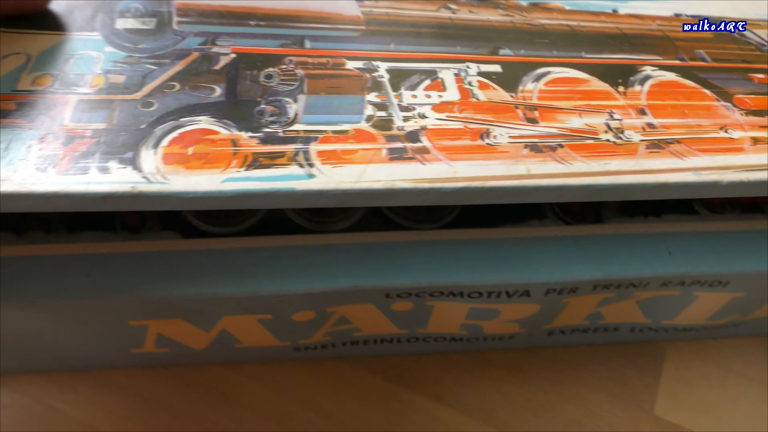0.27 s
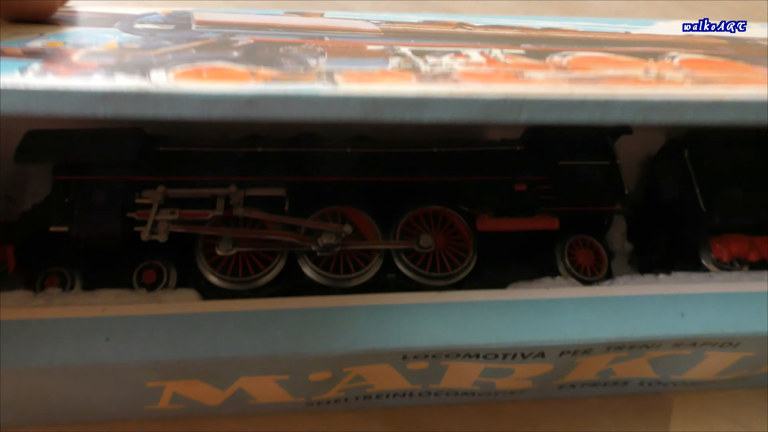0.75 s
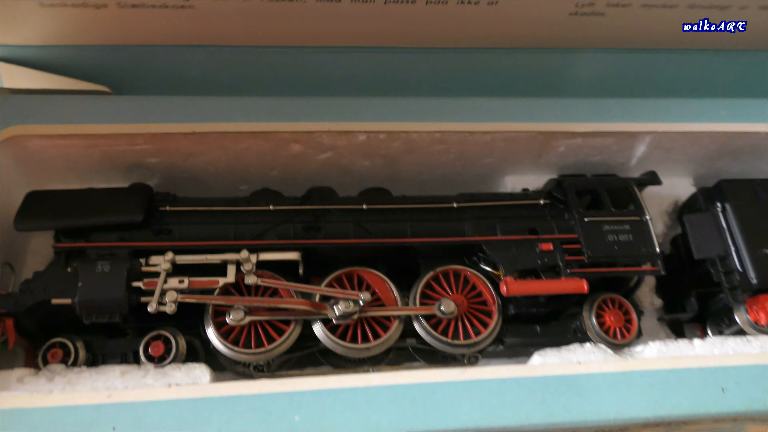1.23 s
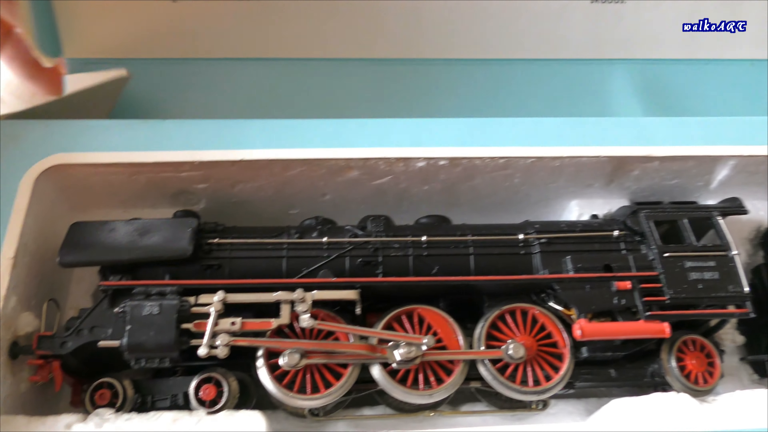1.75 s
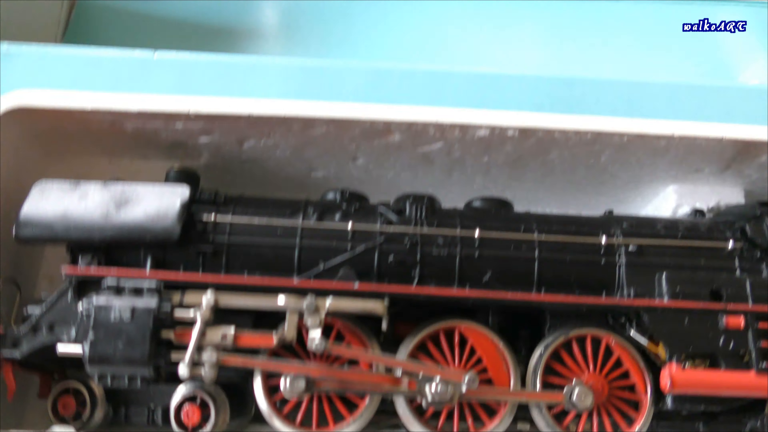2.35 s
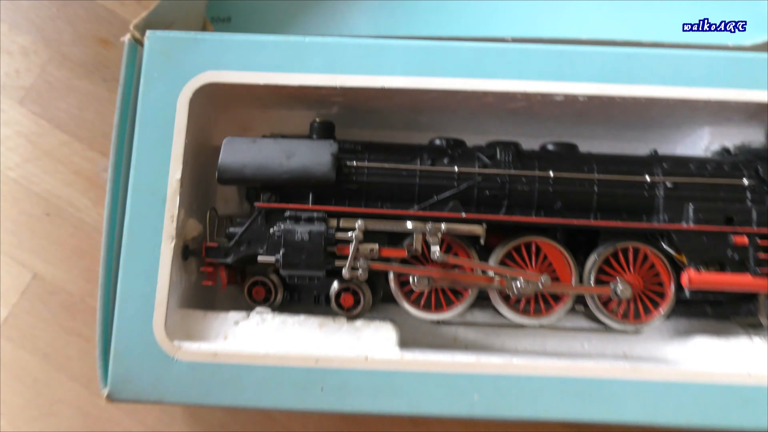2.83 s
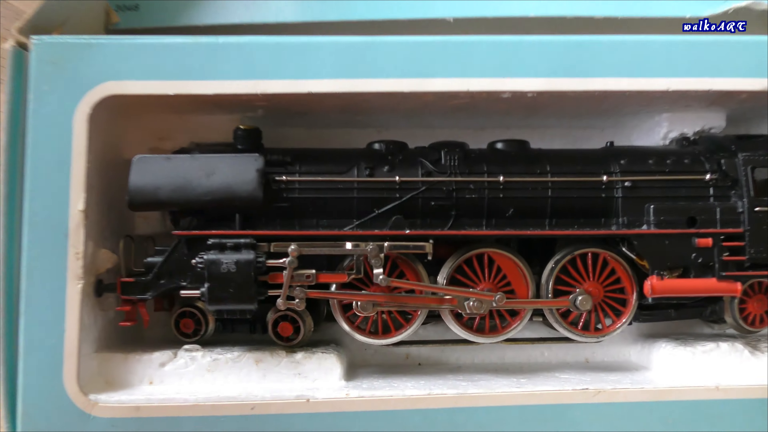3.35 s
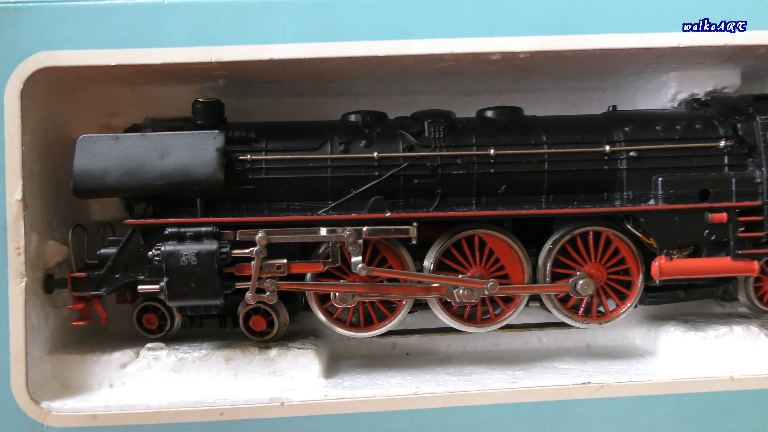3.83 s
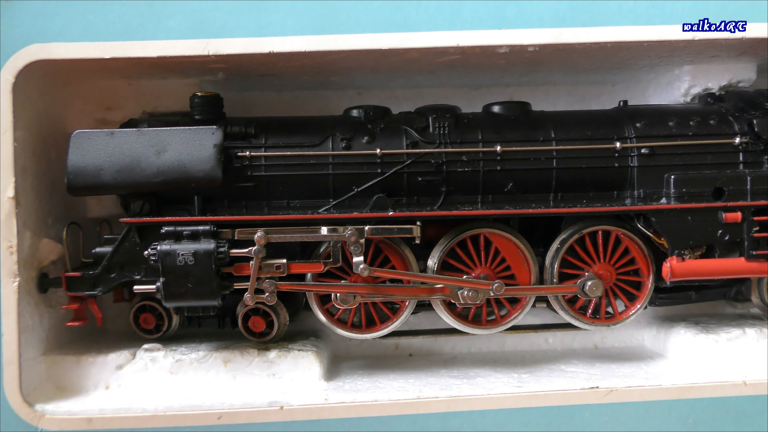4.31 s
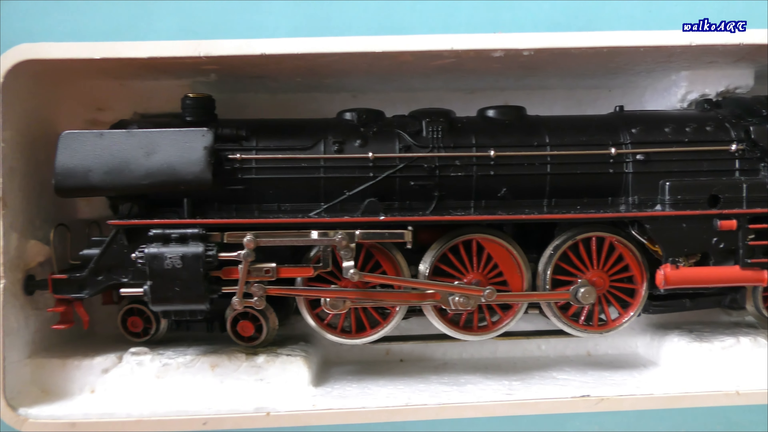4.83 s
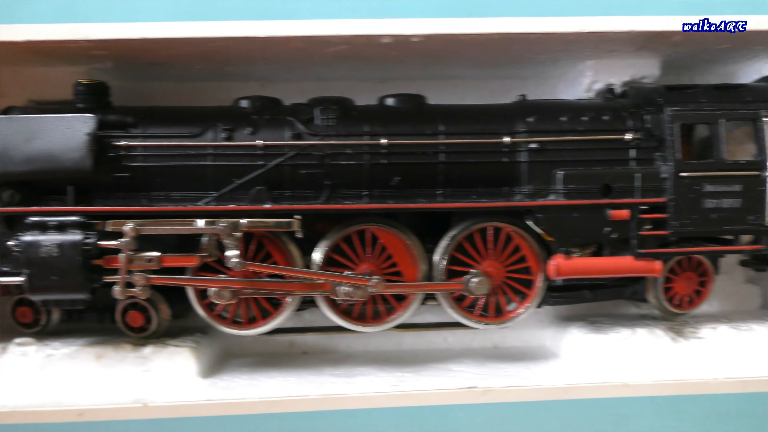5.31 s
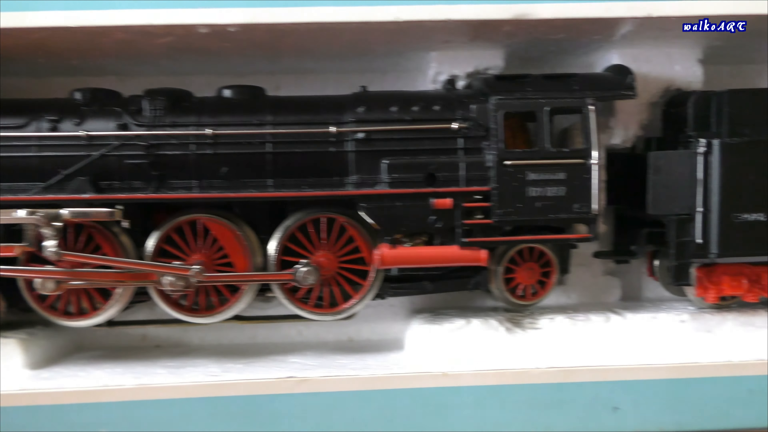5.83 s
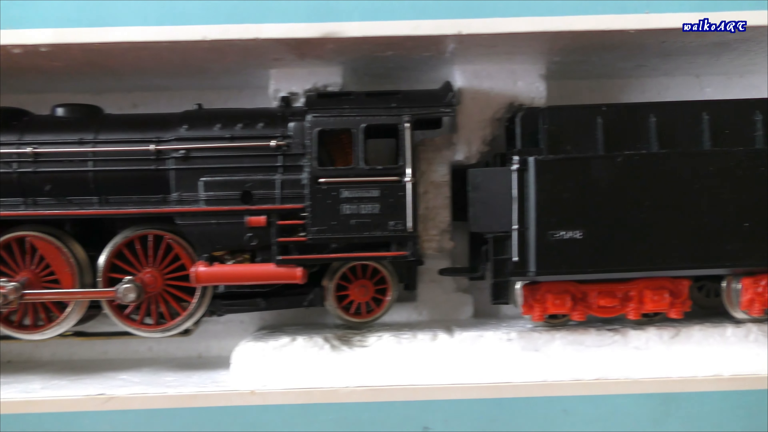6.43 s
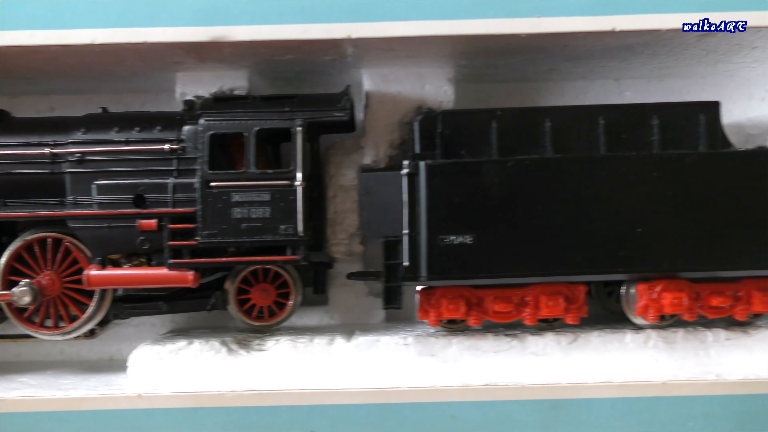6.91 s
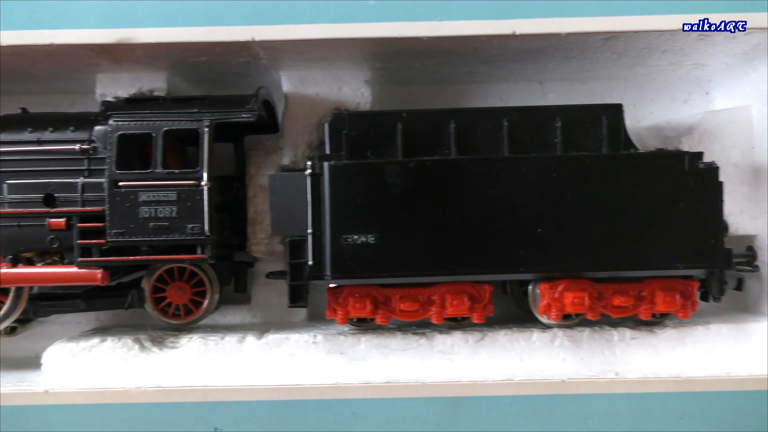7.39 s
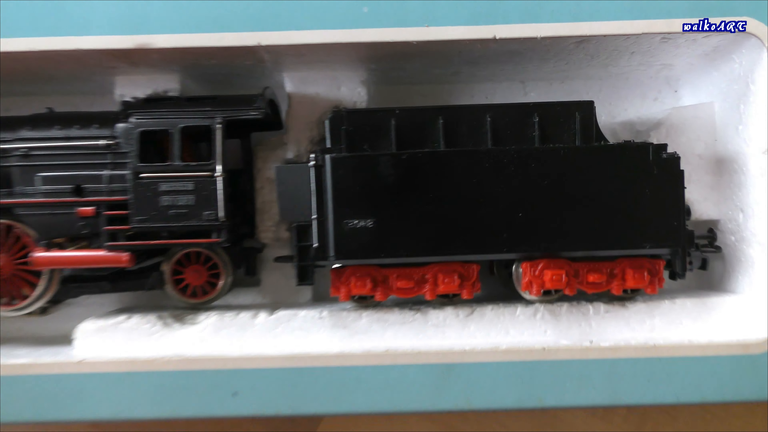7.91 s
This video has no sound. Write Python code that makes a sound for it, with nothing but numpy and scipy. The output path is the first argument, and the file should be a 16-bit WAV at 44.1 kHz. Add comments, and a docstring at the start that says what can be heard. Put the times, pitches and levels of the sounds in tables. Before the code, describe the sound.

A cardboard lid scrapes off a box and comes free with a hollow knock, followed by light creaks and ticks of handled cardboard.

```python
"""The lid of a cardboard box is drawn off close to a hand-held camera in a small room.
First it rasps along the box, stroke by stroke, as friction snaps tiny paper fibres. Its rim catches,
and at 1.4 s it comes free with a knock that rings the hollow box. Slid aside, it judders by stick and
slip as it slows. Then the board creaks and ticks under the fingers, each slip ringing its panel modes.
Soft bumps of the grip and a quiet hiss lie underneath to the end."""
import sys
import numpy as np
from scipy import signal
from scipy.fft import rfft, irfft, next_fast_len
from scipy.io import wavfile

SR = 44100
rng = np.random.default_rng(int(sys.argv[2]) if len(sys.argv) > 2 else 0)


def store_pcm(level_fs):
    """Save levels as 16-bit WAV."""
    pcm = np.round(np.clip(level_fs, -1, 1) * 32767).astype(np.int16)
    wavfile.write(sys.argv[1], SR, np.atleast_2d(pcm).T)


N = 359415
TIME = np.arange(N) / SR
FFT_SIZE = next_fast_len(N)


# strokes of the lid: t/s at full speed, rise/s per 10 dB, hold/s, fall/s per 10 dB,
# rasp level/dB, hiss level/dB, drone level/dB
STROKES = [(0.18, .14, .03, .035, -48.5, -58, -61), (1.152, .5, .18, 0.18, -47.5, -48, -50),
           (1.315, .02, 0.022, 0.01, -42, -48, -51), (1.463, .08, .1, 0.65, -56.5, -53.5, -56.5),
           (1.869, 0.2, 0.065, .15, -47, -53.5, -52), (2.093, 0.19, 0.066, 0.25, -50, -48.5, -54),
           (2.254, 0.12, 0.12, 0.07, -43.5, -63, -51.5), (2.685, 0.15, .04, 0.25, -56, -60, -57),
           (3.006, .05, 0.03, .1, -64, -60.5, -56)]
# spectra of the rasp on the box, the rasp aside, fine hiss and panel drone: f/Hz, relative level/dB
LID_RASP = [(450, -33), (620, -5.5), (780, -11), (950, -0.5), (1250, -1.5), (1600, -3.5), (2050, -1.5),
            (2600, -2), (3300, -11), (4200, -15), (6000, -33), (9000, -31)]
ASIDE_RASP = [(400, -25), (490, 7), (600, -33), (730, -6.5), (900, -0.5), (1250, 4), (1650, -1),
              (2050, -0.5), (2350, -5), (3300, -8.5), (4300, -12.5), (5600, -18), (9000, -24)]
FINE_HISS = [(1500, -7), (3500, 6), (5000, 4.5), (7000, 2), (9000, 1), (12000, 0), (16000, -7)]
PANEL_DRONE = [(40, -26), (120, -13.5), (220, -5.5), (300, 2.5), (360, -3.5), (480, -7.5), (600, -23),
               (1200, -41)]

def sliding_lid(aside_s=1.88, sticks_s=2.23, rest_s=3.25, hiss_exponent=1.85, drone_exponent=1.33):
    """Sliding friction: the rasp grows with speed, the hiss and panel drone with powers of it."""
    aside = np.clip((TIME - aside_s) / .11 + .5, 0, 1)
    sticking = np.clip((TIME - sticks_s) / .04 + .5, 0, 1)
    on_box = colour(fibres(2500, size_db=4, smooth=1, flutter_db=.85, flutter_hz=95), LID_RASP)
    pushed = colour(fibres(5000, size_db=1.5, smooth=.94, flutter_db=.55, flutter_hz=90), ASIDE_RASP)
    pushed *= 1 - sticking + sticking * chatter()
    rasp = np.sqrt(1 - aside) * on_box * pan(.8) + np.sqrt(aside) * pushed * pan(-1.2)
    hiss = colour(fibres(5000, size_db=3, smooth=1, flutter_db=1, flutter_hz=47), FINE_HISS, spread=.82)
    drone = colour(noise(), PANEL_DRONE)
    power = amp([[-64.5], [-69.5], [-63]]) ** 2  # light rub between strokes: rasp, hiss, drone
    for peak_s, rise_s, hold_s, fall_s, *levels_db in STROKES:
        before = np.maximum(peak_s - TIME, 0) / rise_s
        after = np.maximum(TIME - peak_s - hold_s, 0) / fall_s
        speed = np.maximum(amp(-10 * (before + after)), 1e-6)
        gains = amp(levels_db)[:, None] * [speed, speed ** hiss_exponent, speed ** drone_exponent]
        power = power + gains ** 2
    pressure = amp(wander(hz=14)) * np.clip((rest_s - TIME) / .12, 0, 1)
    return pressure * sum(gain * layer for gain, layer in zip(np.sqrt(power), (rasp, hiss, drone)))


def fibres(per_s, size_db, smooth, flutter_db, flutter_hz):
    """Shot noise: paper fibres snap at random over a smooth rub, both swelling with the uneven stroke."""
    snapping = rng.random(N) < per_s / SR
    snaps = snapping * amp(size_db * np.minimum(rng.exponential(1, N), 4))
    return (unit(snaps * noise()) + smooth * noise()) * amp(flutter_db * wander(flutter_hz))


def chatter(per_s=120, unevenness=.45, depth_db=12):
    """Relaxation oscillation: the level surges at each uneven slip and fades until the next."""
    slips = np.cumsum(per_s * np.exp(unevenness * wander(hz=150))) / SR
    return unit(amp(-depth_db * (slips % 1)))


# rubs of a tight edge: t/s at the peak, half length/s, level/dB, f/Hz, relative half bandwidth
SWISHES = [(0.177, 0.054, -63.5, 6840, 0.079), (0.15, 0.105, -55.5, 720, 0.81),
           (0.207, 0.035, -60.5, 4300, .25), (0.96, .12, -53.5, 2130, .2), (1.269, 0.037, -43, 4180, 0.15),
           (1.276, 0.054, -42.5, 2520, 0.079), (1.3995, .002, -23.5, 2830, 0.1),
           (1.62, .1, -54.5, 2430, 0.13), (1.918, 0.11, -52, 4420, 0.17), (2.145, 0.099, -52, 3760, 0.24),
           (3.86, .0015, -42, 5000, .16), (5.2618, .0015, -37.5, 4700, .1)]

def swishes(apart=.28):
    """Resonance: a tight edge filters the noise of a rub or flick into one band."""
    out = np.zeros((2, N))
    for s, half, db, hz, width in SWISHES:
        t = np.arange(max(-2.5 * half, -s), 2.5 * half, 1 / SR)
        rub = rng.standard_normal(len(t)) + apart * rng.standard_normal((2, len(t)))
        band = filtered(rub, [hz / (1 + width), hz * (1 + width)], "band")
        add(out, s + t[0], amp(db) * unit(band) * np.exp(-(t / half) ** 2))
    return out


# snags of the rim: t/s, level/dB, upper over lower modes/dB, snap/dB and edge/dB re level, skid/s
CATCHES = [(0.267, -43.5, 3, -10, -14.5, 0.0012), (0.599, -62, -2, 2, -5, .001),
           (0.646, -62, 0, 2, -3, .0011), (0.697, -65, 5, 8, 6, 0.0013), (0.867, -51.5, 8, -3, -8, 0.006),
           (1.13, -47, 17, 4.5, 3, .0005), (1.1423, -36.5, 26, -3, -3.5, 0.0011),
           (1.196, -44, 14, -3, -5, 0.0012), (1.2112, -45, 19, -4, -11, .0014),
           (1.2811, -36, 3, -3, -5, 0.0053), (1.2929, -26.5, 0, -9, -13, 0.0018),
           (1.304, -32.5, -3, -7, -6.5, .0012), (1.347, -41, 17, 0, -5, 0.0025),
           (1.3874, -39.5, 13, -4, -4, .0018), (1.393, -36.5, -1, -5, -4, 0.0024),
           (1.3971, -24, -7, -5, -12, .0016)]

def catches():
    """Elastic release: the paper rim snags and snaps free, and the grip damps the ringing."""
    out = np.zeros((2, N))
    for s, level_db, upper_db, snap_db, edge_db, skid_s in CATCHES:
        add(out, s, slip(level_db, upper_db, snap_db, edge_db, pan_db=0, skid_s=skid_s, ring=.75))
    return out


# blows of lid or hand on the box: t/s, peak level/dB, pitch factor, low-pass f/Hz
KNOCKS = [(0.266, -32, 1.25, 2200), (1.2939, -24.5, 1.25, 1800), (1.3039, -37, 1.07, 1200),
          (1.3971, -17.5, 0.98, 1500), (1.876, -37, 1.1, 900), (5.712, -42.5, .9, 130),
          (6.205, -44, 1.1, 200), (7.196, -44, 0.948, 180), (7.309, -47, .85, 180)]
# modes of the hollow box at pitch factor 1: f/Hz, relative level/dB, T60/s
CAVITY_MODES = [(114, -1.5, 0.042), (192, 4, 0.064), (240, -1.5, 0.034), (320, 0, 0.083),
                (402, -4.5, 0.072), (496, -1, 0.033), (607, -11, 0.025), (684, -6, 0.023)]

def knocks(rise_s=.00094, leak_hz=120):
    """Cavity resonance: blows ring the open box, which leaks deep bass; soft ones wake only low modes."""
    out, t = np.zeros((2, N)), np.arange(SR // 4) / SR
    for s, peak_db, pitch, soft_hz in KNOCKS:
        ring = sum((-1) ** k * amp(db - 60 * t / t60) * np.sin(2 * np.pi * hz * pitch * t)
                   for k, (hz, db, t60) in enumerate(CAVITY_MODES))
        ring = filtered(ring * (1 - np.exp(-t / rise_s)), leak_hz, "high", order=3)
        ring = filtered(ring, soft_hz, "low")
        add(out, s, amp(peak_db) * ring / abs(ring).max() * pan(1.2))
    return out


def judder(start_s=2.21, end_s=2.46, per_s=34):
    """Stick-slip motion: the slowing lid moves in uneven jerks, each of its own strength and colour."""
    out = np.zeros((2, N))
    for s in np.arange(start_s, end_s, 1 / per_s):
        size, place, late = rng.uniform(-1, 1, 3)
        jerk = slip(level_db=-45 + 2 * size, upper_db=2 + 4 * place, snap_db=-14, edge_db=-20)
        add(out, s + .5 * late / per_s, jerk)
    return out


# creaks of the board: t/s, level/dB, upper over lower modes/dB, snap/dB and edge/dB re level,
# boost of the lowest mode/dB, delay of a second slip/s (0 for none)
CREAKS = [(1.8755, -43.5, -4, -13, -20, 1, 0.001), (2.2523, -39, 8, -13, -24, 0, 0.011),
          (2.352, -40, 17, -12, -19, 0, 0.02), (2.386, -40, -5, -17, -22, 0, 0.0015),
          (2.4, -36.5, 5, -6.5, -23, 4, 0.0078), (2.4702, -45, 9, -13, -14, 0, 0),
          (2.6609, -40, 7, -21, -21, 2, 0.00065), (2.6729, -36.3, 3, -10.5, -21, 0, .011),
          (2.698, -43, -8, -15, -22, 0, 0.0013), (2.729, -37.5, 2.5, -21, -17, 0, 0.001),
          (2.7586, -40.5, 4, -18, -19, 0, 0), (3.1313, -44.5, 1, -13.5, -23, 0, 0.024),
          (3.2044, -38, 2.5, -8.5, -20, 1, 0.0083), (3.3558, -39, 7, -10, -21, -1, 0.00026),
          (3.3823, -36.3, 4, -12.5, -27, -3, .0095), (3.4449, -36.5, -0.5, -11, -22, -3, 0.012),
          (3.5, -37, 2, -5, -29, -1, .0124), (3.523, -41, 0, -8, -17, -1, 0.001),
          (3.5886, -37, 3, -10.5, -26, 4, 0), (3.7367, -35, 7.5, -11, -21, 6, 0),
          (3.8032, -39, 6, -12.5, -22, 0, 0.00039), (3.858, -39.5, -3, -6, -16, 1, 0),
          (4.467, -47.5, -23, -16, -29, -6, 0), (5.2597, -37.5, -3, -8, -29, -5, 0.0014),
          (6.1568, -44, 10, -6, -19, 0, 0), (6.1605, -42.5, -1.5, -10, -25, 9, 0.00044),
          (6.3888, -38.5, 1.5, -6.5, -18, 9.5, 0.01), (6.4538, -43.5, 2, -11, -24, 7, 0),
          (6.897, -55.5, -3, -19, -24, -2, 0), (7.0606, -36, 8, -11.5, -16, 2, 0),
          (7.242, -33.5, 12, -10, -17, 0, 0), (7.244, -36, 4, -8.5, -18, 3, 0.0055),
          (7.653, -46.5, -9, -17, -30, -4, 0)]

def creaks(second_slip_db=-4.5):
    """Static friction gives way: the board slips under the fingers, often again and more weakly."""
    out = np.zeros((2, N))
    for s, level_db, *touch, again_s in CREAKS:
        add(out, s, slip(level_db, *touch))
        if again_s:
            add(out, s + again_s, slip(level_db + second_slip_db, *touch))
    return out


# bending modes of the board: f/Hz, relative level/dB, T60/s
PANEL_MODES = [(492, -11, 0.067), (907, -7, 0.024), (1061, -2.5, 0.035), (1237, -4, 0.034),
               (1398, -4, 0.03), (1840, 2.5, 0.023), (1970, 1, 0.025), (2079, 7.5, 0.024),
               (2444, -1, 0.025), (2567, -4, 0.029), (3204, -2.5, 0.012), (3860, -2, 0.0073),
               (4370, -4.5, 0.0095), (4560, -5.5, 0.0088), (5230, -12.5, 0.0044), (5710, -18.5, 0.014),
               (7200, -26, 0.0075)]

def slip(level_db, upper_db, snap_db, edge_db, body_db=0, pan_db=-1.8, skid_s=.00125, ring=1):
    """Modal superposition: a short gritty skid rings the panel modes, weighted by where it lands."""
    t = np.arange(4096) / SR
    hz, db, t60 = np.transpose(PANEL_MODES)[:, :, None]
    lower, high = hz < 1550, hz > 3000
    size, detune, phase = rng.standard_normal((3, len(PANEL_MODES), 1))
    # each mode feels the skid at its own point of the panel
    age = t[:1024] / skid_s
    force = .62 * rng.standard_normal((len(PANEL_MODES), len(age)))
    force *= np.exp(-age) * (1 - np.exp(-4 * age))
    force[:, 0] = 1
    hardness_db = .94 * (snap_db + 17.5) * np.log2(hz / 4000)  # a harder snap reaches higher modes
    db = db + .9 * size + high * hardness_db
    db[0] += body_db  # a push near the middle bends the panel as a whole
    stereo_turns = np.array([-.039, .039])[:, None, None] * phase
    turns = hz * (1 + .028 * detune) * t + stereo_turns
    free = amp(db - 60 * t / (ring * t60)) * np.sin(2 * np.pi * turns)
    driven = signal.fftconvolve(free, force[None], axes=2)[:, :, :len(t)]
    driven *= np.linalg.norm(free, axis=2, keepdims=True) / np.linalg.norm(driven, axis=2, keepdims=True)
    bands = [radiate((driven * band).sum(1)) for band in (lower, ~lower & ~high, high)]
    # parting fibres give a crisp edge, partly different at each microphone
    fade = np.exp(-t / (1.5 * skid_s)) * (1 - np.exp(-5 * t / skid_s))
    crack = rng.standard_normal(len(t)) + .53 * rng.standard_normal((2, len(t)))
    edge = filtered(crack * fade, [10000, 15500], "band")
    share = 1 / np.hypot(1, amp(upper_db))
    gains = [share * amp(-.2), share * amp(upper_db), amp(snap_db), amp(edge_db)]
    sound = sum(gain * unit(part) for gain, part in zip(gains, bands + [edge]))
    sound *= np.sqrt(.007 * SR / len(t))  # level counts the energy as if spread over 7 ms
    return sound * amp(level_db) * pan(pan_db)


def radiate(x, bass_hz=330, gap_hz=665):
    """Radiation from a small panel: bass is weak, and the first two modes cancel between their peaks."""
    x = filtered(x, bass_hz, "high")
    gap = x - signal.lfilter(*signal.iirnotch(gap_hz, Q=1.4, fs=SR), x)
    return x - .73 * gap


# shifts of the grip: t/s at the middle, half length/s, bump level/dB, sway level/dB
GRIP_SHIFTS = [(0.242, .07, -64, -58.5), (0.55, .06, -59.5, -80), (0.694, .03, -55, -76),
               (0.91, 0.035, -57, -82), (1.43, 0.057, -51, -65), (2.06, 0.11, -54, -80),
               (2.36, 0.13, -49.5, -57.5), (2.68, 0.23, -58.5, -79), (3.038, 0.051, -52, -77),
               (3.163, 0.046, -55, -72), (4.81, 0.046, -78, -61), (5.25, 0.076, -62.5, -58.5),
               (5.725, 0.078, -56, -74), (6.22, .085, -50.5, -63), (6.524, 0.081, -55, -66),
               (6.716, 0.14, -61, -65), (7.213, .03, -49, -58), (7.32, .09, -54, -57),
               (7.665, 0.049, -60, -75), (7.83, .04, -63, -61), (7.91, 0.074, -55.5, -74)]
# spectra of a soft bump and of the camera's sway: f/Hz, relative level/dB
BUMP = [(30, -39), (70, -17), (110, -1), (190, 2.5), (260, -4), (350, -12), (500, -18.5), (1000, -51)]
SWAY = [(12, -10), (28, -2), (50, -4), (80, -21), (200, -36), (600, -72)]

def handling(tremble_bump_db=-66, tremble_sway_db=-79.5, lumpy_db=2):
    """Structure-borne sound: a trembling hand bumps and sways the camera, more as the grip shifts."""
    bump_power, sway_power = amp(tremble_bump_db) ** 2, amp(tremble_sway_db) ** 2
    for s, half, bump_db, sway_db in GRIP_SHIFTS:
        swell = np.exp(-np.minimum(abs(TIME - s) / half, 10) ** 2)
        bump_power += (amp(bump_db) * swell) ** 2
        sway_power += (amp(sway_db) * swell) ** 2
    bumps = colour(noise() * amp(lumpy_db * wander(hz=18)), BUMP)
    return bumps * np.sqrt(bump_power) + colour(noise(), SWAY) * np.sqrt(sway_power)


# brushes of a finger: t/s, length/s, level/dB
BRUSHES = [(4.108, 0.076, -61), (5.114, 0.064, -59), (6.117, 0.087, -55), (7.122, 0.064, -56)]

def brushes():
    """Light friction: a finger draws brief swells of rasp from the board."""
    swells = sum(amp(db) * np.sin(np.pi * np.clip((TIME - s) / length, 0, 1))
                 for s, length, db in BRUSHES)
    return swells * colour(noise(), ASIDE_RASP)


def room(x, crossfade_s=1.9, count=3):
    """Small-room reverberation: echo tails crossfade slowly, so each click has an unpitched decay."""
    shares = [np.cos(np.pi * (TIME / crossfade_s + k / count)) * np.sqrt(2 / count)
              for k in range(count)]
    return sum(signal.oaconvolve(x * share, reflections(), axes=1)[:, :N] for share in shares)


# reverberation time of the room: f/Hz, T60/s
ROOM_DECAY = [(100, 0.17), (400, 0.23), (1000, 0.39), (2200, 0.45), (5000, 0.4), (12000, 0.66)]

def reflections(gap_s=.005, early_db=5, early_s=.022, shared=.88, per_s=3000):
    """Absorption: dense echoes, strongest from the near floor and box, die at each band's own rate."""
    age = np.arange(SR // 3) / SR
    taps = rng.standard_normal((3, len(age))) * (rng.random((3, len(age))) < per_s / SR)
    taps = taps[:2] + shared * taps[2]
    taps *= (age > gap_s) * amp(early_db * np.exp(-age / early_s))
    hz, t, bands = signal.stft(taps, SR, nperseg=256)
    dull_db = -6 * np.clip(np.log2((hz[:, None] + 1) / 2700), 0, 2)
    decay_db = -60 * t / read(ROOM_DECAY, hz)[:, None]
    tail = signal.istft(bands * amp(dull_db + decay_db), SR, nperseg=256)[1]
    return tail / np.linalg.norm(tail[0])


# spectra of the room air and the microphone hiss: f/Hz, relative level/dB
ROOM_AIR = [(15, -25), (30, -9.5), (60, -16.5), (100, -3.5), (160, -8.5), (250, -12), (340, -9.5),
            (450, -16.5), (590, -29), (700, -16.5), (790, -30), (960, -13.5), (1400, -17), (2050, -16),
            (2600, -44), (4000, -67)]
MIC_HISS = [(1800, -25), (2350, 0.5), (2600, 0.5), (2790, 9.5), (2950, -2), (3200, -2.5), (3800, -10),
            (5200, -15), (6500, -20), (8000, -17), (10000, -13), (13000, -10.5), (16000, -14.5)]

def background(air_db=-61.5, hiss_db=-63.5):
    """Stationary noise: still room air and microphone hiss with a narrow peak near 2.8 kHz."""
    air = amp(air_db) * colour(noise(), ROOM_AIR, spread=2.25)
    hiss = amp(hiss_db) * colour(noise(), MIC_HISS, spread=1.57)
    return (air + hiss) * pan(1.2)


# likeness of left and right: f/Hz, correlation at spread 1
CORRELATION = [(30, 0.94), (150, 0.84), (500, 0.9), (2000, 0.82), (6000, 0.68), (14000, 0.74)]

def colour(drive, spectrum, spread=.76):
    """Partial coherence: two unrelated drives take one spectrum and blend as middle and side."""
    hz = np.fft.rfftfreq(FFT_SIZE, 1 / SR)
    mid, side = rfft(drive, FFT_SIZE) * amp(read(spectrum, hz))
    same = np.clip(read(CORRELATION, hz), 0, 1)
    side *= spread * np.sqrt((1 - same) / (1 + same))
    return unit(irfft([mid + side, mid - side], FFT_SIZE)[:, :N])


def wander(hz):
    """Random fluctuation of unit rms, band-limited to about hz."""
    f = np.fft.rfftfreq(FFT_SIZE, 1 / SR)
    lowpass = np.exp(-np.minimum(f / hz, 10) ** 2)
    return unit(irfft(rfft(rng.standard_normal(FFT_SIZE)) * lowpass, FFT_SIZE)[:N])


def noise():
    """Two uncorrelated white noises."""
    return rng.standard_normal((2, N))


def filtered(x, hz, kind, order=2):
    """Maximally flat filter."""
    return signal.lfilter(*signal.butter(order, hz, kind, fs=SR), x)


def amp(db):
    """Decibels to amplitude ratio."""
    return 10 ** (np.asarray(db) / 20)


def pan(db):
    """Level difference, left over right."""
    return amp([[db / 2], [-db / 2]])


def unit(x):
    """Normalisation to unit rms."""
    return x / np.sqrt(np.mean(x ** 2) + 1e-20)


def read(points, hz):
    """Interpolation on a log-frequency axis."""
    f, value = np.transpose(points)
    return np.interp(np.log(hz + 1), np.log(f + 1), value)


def add(mix, s, sound):
    """Superposition of a stereo sound at time s."""
    part = mix[:, max(round(s * SR), 0):][:, :sound.shape[1]]
    part += sound[:, :part.shape[1]]


def scene():
    """Direct and reverberant fields: the box and its echo add to the handling noise and background."""
    around = handling() + brushes() + background()
    box = amp(-.5) * sliding_lid() + swishes() + knocks()
    box += amp(.5) * catches() + amp(.44) * creaks() + judder()
    return box + amp(-16) * room(box) + around


def record(dry, cutoff_hz=16100):
    """Band limiting: the camera passes no extreme treble."""
    lowpass = signal.firwin(511, cutoff_hz, window=("kaiser", 9), fs=SR)
    return signal.oaconvolve(dry, lowpass[None], "same")


dry = scene()
out = record(dry)
store_pcm(out)
```